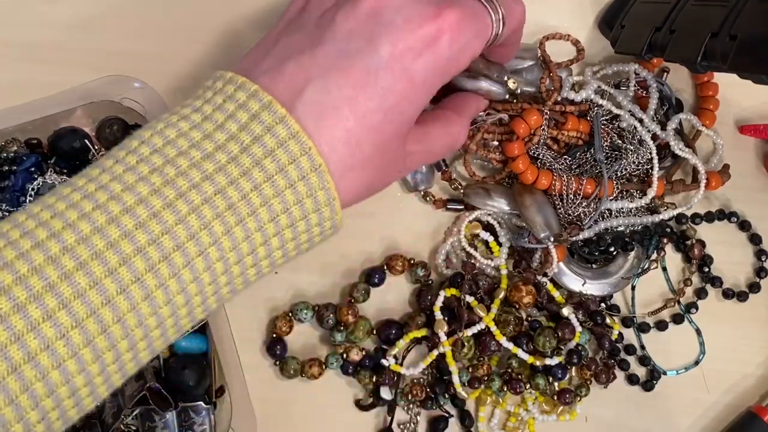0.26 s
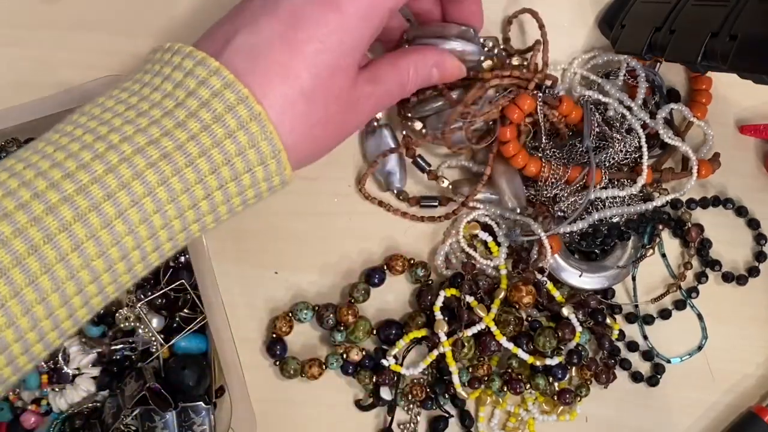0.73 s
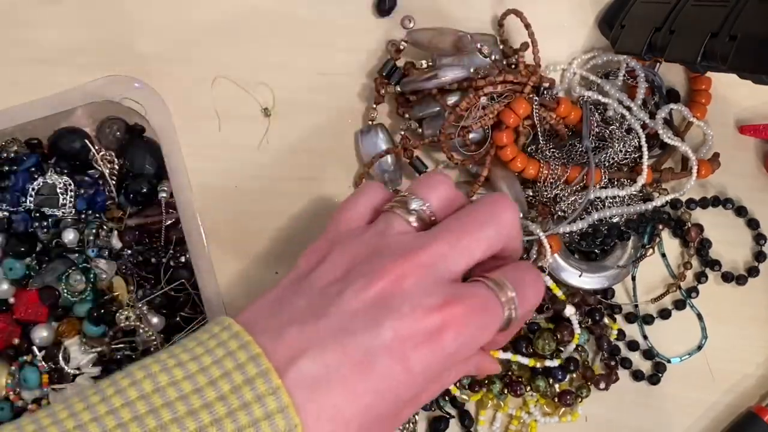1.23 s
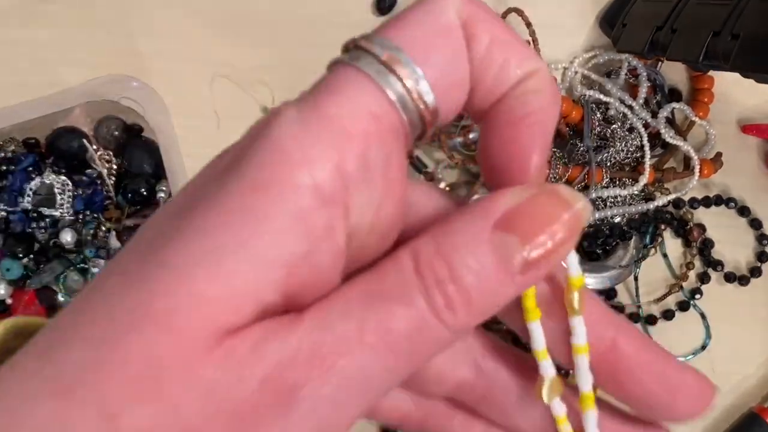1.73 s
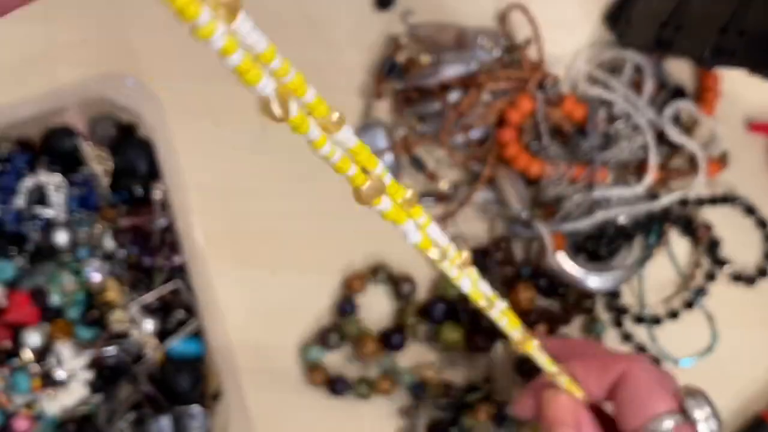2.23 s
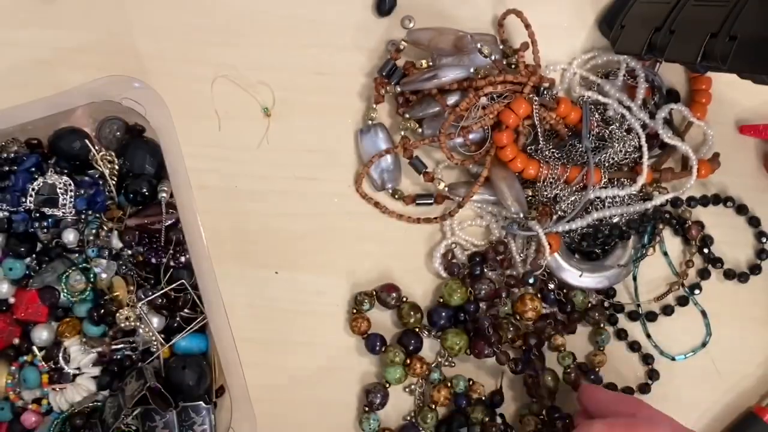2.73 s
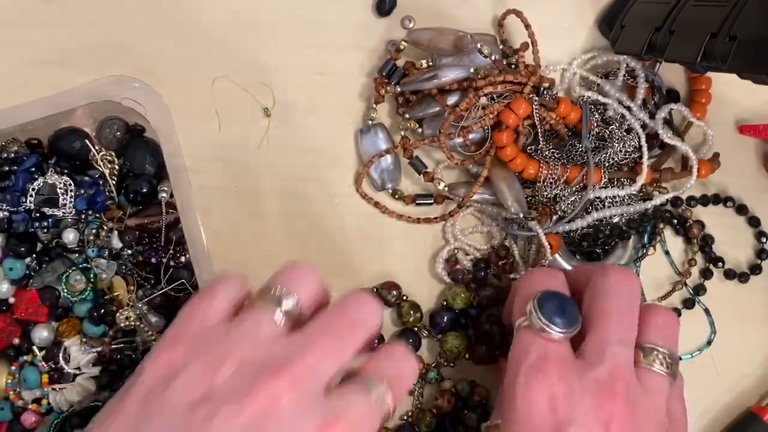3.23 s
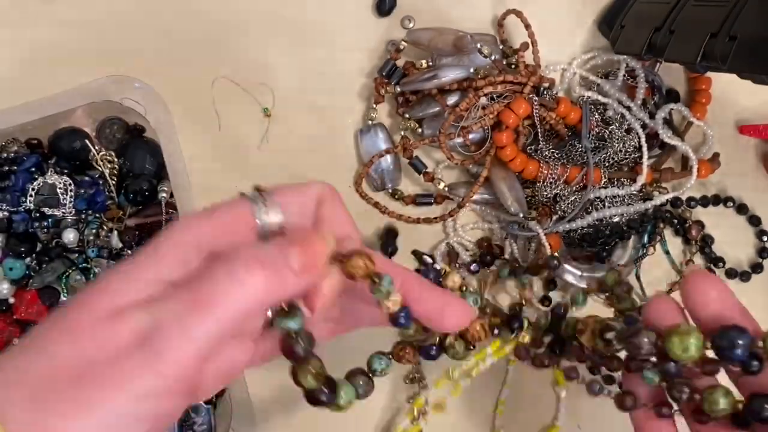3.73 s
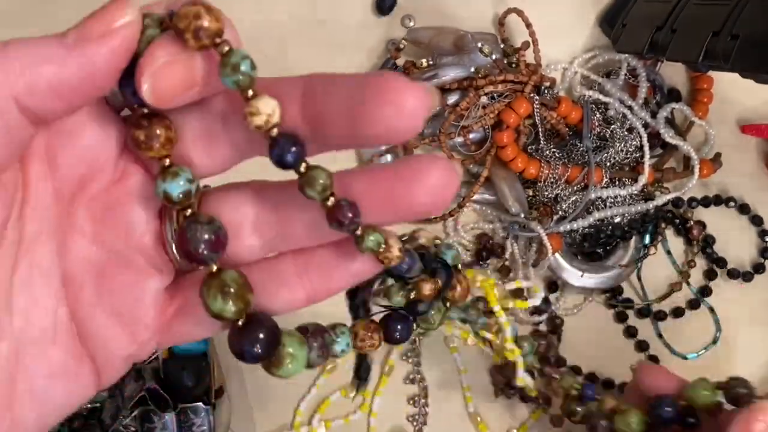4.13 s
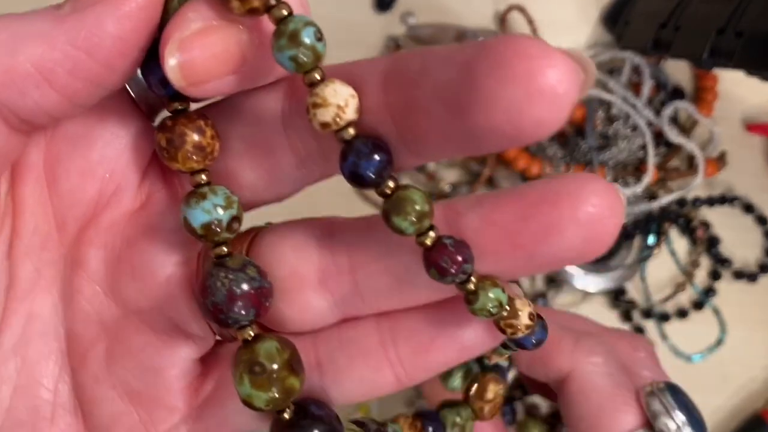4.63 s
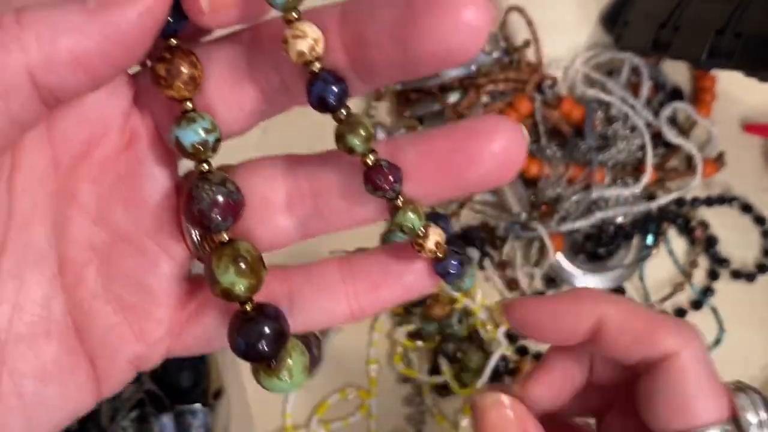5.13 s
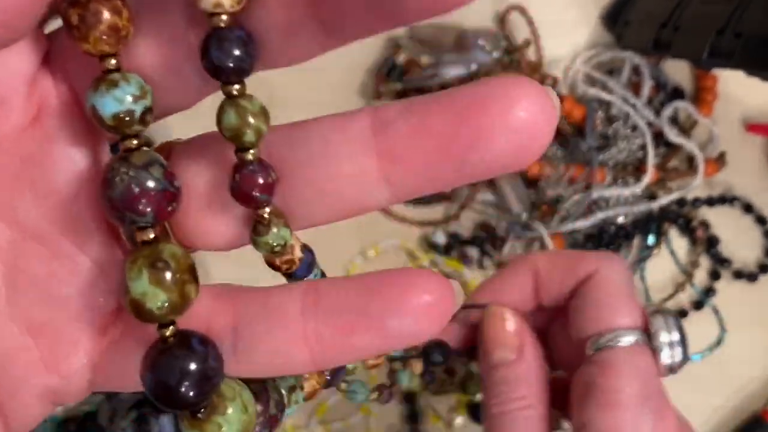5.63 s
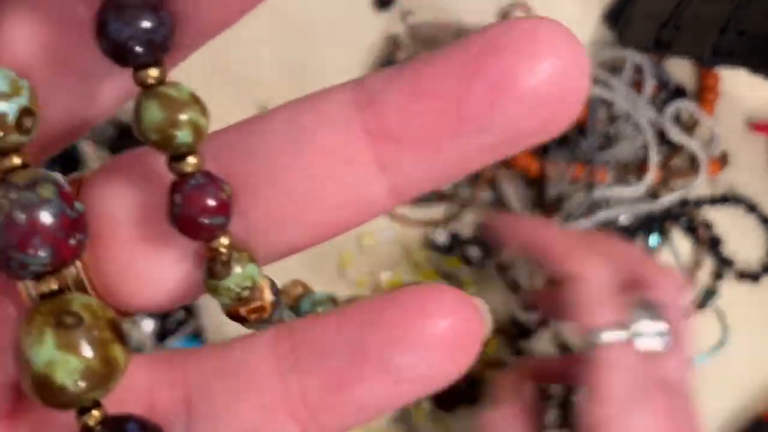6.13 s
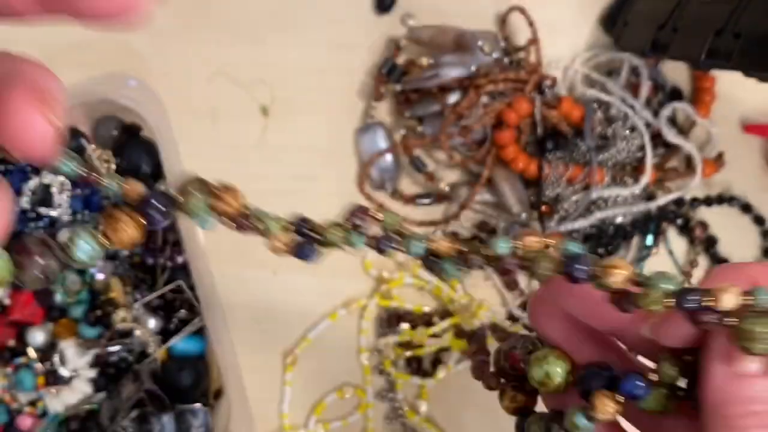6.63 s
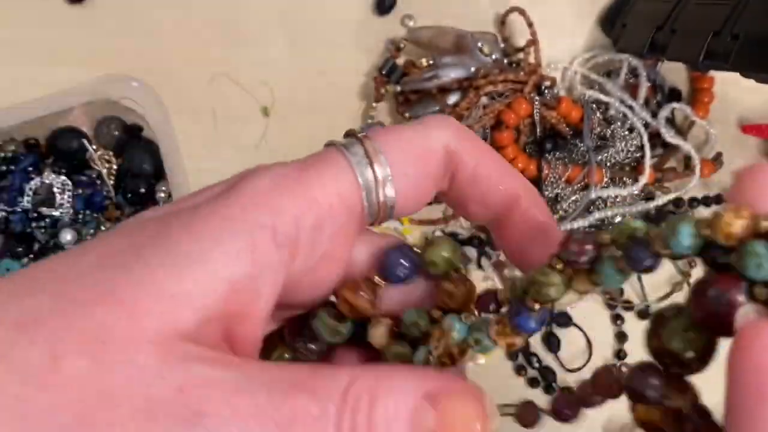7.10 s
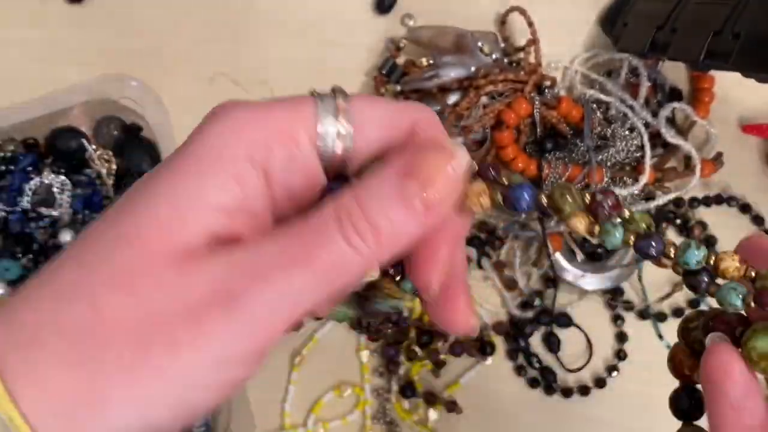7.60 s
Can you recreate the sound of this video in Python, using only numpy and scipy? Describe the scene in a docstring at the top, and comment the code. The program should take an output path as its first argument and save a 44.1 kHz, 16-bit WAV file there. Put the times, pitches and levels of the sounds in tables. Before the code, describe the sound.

Close, dry clatter of stone and glass beads with fine metallic trickles as hands untangle strands on a wooden tabletop, faint squeak near the end.

```python
"""A small room with a wooden table: hands pull bead necklaces and thin chains out of a heap of jewellery.
Big beads clack and knock on the table top: noise bursts coloured by bead tones and the modes of the board.
Small beads and links tick and trickle in between, as clumps of short bright rings over soft rubbing.
Near the end comes a faint thin squeak, a narrow noise band. Low rumble and room hush lie underneath,
and two closely spaced microphones hear the heap from above."""
import sys
import numpy as np
from scipy import signal
from scipy.fft import rfft, irfft, next_fast_len
from scipy.io import wavfile
from scipy.ndimage import uniform_filter1d

SR = 44100
rng = np.random.default_rng(int(sys.argv[2]) if len(sys.argv) > 2 else 0)


def wrap_up_sound(samples):
    """Save the sound to the file named by the first command line argument, as 16-bit audio."""
    columns = np.atleast_2d(samples).T
    # keep every value between -1 and 1, then stretch to whole-number steps
    tamed = np.clip(columns, -1, 1)
    steps = np.round(tamed * 32767).astype(np.int16)
    wavfile.write(sys.argv[1], SR, steps)


N = 346532
TIME = np.arange(N) / SR
SIZE = next_fast_len(N + SR)  # transform length, with space for the reverberation
FREQS = np.maximum(np.arange(SIZE // 2 + 1) * SR / SIZE, 1)
AGE = np.arange(SR // 20) / SR  # time within the ring of one contact

# hand and heavy strands landing on the table: (time [s], relative level [dB])
LANDINGS = [(0.166, -50), (0.365, -48), (0.701, -37), (1.454, -41), (1.542, -40.5), (1.745, -46),
            (3.179, -34), (3.329, -41), (4.226, -38.5), (4.264, -39.5), (4.391, -30), (4.446, -30.5),
            (4.486, -38.5), (4.874, -38), (5.085, -37), (5.849, -41), (6.039, -42), (6.346, -43),
            (7.488, -35.5), (7.505, -48)]


def from_db(db):
    """Decibels to gain."""
    return 10 ** (np.asarray(db) / 20)


def unit(x):
    """Scale to energy 1."""
    return x / np.sqrt(np.sum(x ** 2) + 1e-20)


def at_hz(points, hz):
    """Read a table on a log-frequency axis."""
    f, value = np.transpose(points)
    return np.interp(np.log(hz), np.log(f), value)


def band(x, low_hz, high_hz, order=2):
    """Causal band-pass."""
    edges = [low_hz, min(high_hz, .48 * SR)]
    return signal.sosfilt(signal.butter(order, edges, "band", fs=SR, output="sos"), x)


def lowpass(x, cutoff_hz):
    """Gentle causal low-pass."""
    return signal.sosfilt(signal.butter(2, cutoff_hz, fs=SR, output="sos"), x)


def resonance(x, hz, width_hz):
    """Two-pole resonance with gain 1 on top."""
    r = np.exp(-np.pi * width_hz / SR)
    numerator = np.array([1, 0, -1]) * (1 - r * r) / 2
    denominator = [1, -2 * r * np.cos(2 * np.pi * hz / SR), r * r]
    return signal.lfilter(numerator, denominator, x)


def drift(rate):
    """Random wander through `rate` normal draws a second, joined by straight lines."""
    knots = rng.standard_normal(2000)
    return np.interp(TIME * rate, np.arange(len(knots)), knots)


def add(track, sound, s):
    """Mix a sound into a track at a time."""
    i = int(np.clip(s * SR, 0, N - 1))
    track[i:i + len(sound)] += sound[:N - i]


def hush(apart_hz):
    """Still room: steady low noise shared by both microphones, and a faint hiss that is not."""
    # spectrum of the still room: (frequency [Hz], relative density [dB])
    hush_colour = [(25, -29), (50, -8.5), (75, -17.5), (120, -15.5), (270, -13.5), (600, -29.5),
                   (1100, -33), (4000, -40.5), (14000, -56)]
    level_db = -66.5
    mid, side = rfft(rng.standard_normal((2, SIZE))) * from_db(at_hz(hush_colour, FREQS))
    side = side * FREQS / (FREQS + apart_hz)  # the lows stay common to both sides
    both = irfft(mid + side * [[1], [-1]], SIZE)[:, :N]
    return from_db(level_db) * np.sqrt(2 * N) * unit(both)


def rumble(low_hz, high_hz):
    """A deep band of noise that swells and sinks."""
    # swelling of the rumble: (time [s], level [dB])
    swell = [(0, -70), (.6, -57), (1.1, -66), (1.8, -60), (2.6, -80), (3.5, -60), (4.4, -55), (4.8, -63.5),
             (5.8, -63), (6.5, -56), (7.1, -68), (7.5, -54), (7.86, -65)]
    noise = unit(band(rng.standard_normal(N), low_hz, high_hz)) * np.sqrt(N)
    return noise * from_db(np.interp(TIME, *np.transpose(swell)))


def room(first_echo_s, build_s):
    """Stereo response: the direct sound, then reflections that build up and die band by band."""
    # decay time: (frequency [Hz], t60 [s])
    decay_times = [(100, .27), (300, .26), (700, .18), (1800, .15), (4800, .14), (13000, .08)]
    # strength of the reverberation: (frequency [Hz], relative level [dB])
    reverb_levels = [(100, -9), (350, -6), (700, -3), (1200, -4), (2500, -7), (6000, -9), (14000, -13)]
    # likeness of the reverberation at the two microphones: (frequency [Hz], correlation)
    likeness = [(100, .97), (300, .8), (700, .2), (1200, .1), (2300, .6), (3500, .5), (6000, .1),
                (15000, 0)]
    age = np.arange(SR * 2 // 3) / SR
    onset = 1 - np.exp(-np.maximum(age - first_echo_s, 0) / build_s)
    edges = np.geomspace(50, 18000, 14)
    out = np.zeros((2, len(age)))
    for low, high in zip(edges, edges[1:]):
        hz = np.sqrt(low * high)
        decay = onset * from_db(-60 * age / at_hz(decay_times, hz))
        noises = band(rng.standard_normal((2, len(age))), low, high, order=3)
        mid, side = [unit(noise * decay) for noise in noises]
        alike = np.clip(at_hz(likeness, hz), -1, 1)
        tail = np.sqrt(1 + alike) * mid + np.sqrt(1 - alike) * side * [[1], [-1]]
        out += from_db(at_hz(reverb_levels, hz)) * np.sqrt((high - low) / SR) * tail
    out[:, 0] += 1  # direct sound
    return rfft(out, SIZE)


def squeak(width_hz):
    """A faint, rough squeak: narrow noise shifted up to a pitch that rises a little, then wavers."""
    # glide of the squeak: (time [s], pitch [Hz], relative level [dB])
    glide = [(7.665, 1930, -75), (7.68, 1960, -53.5), (7.72, 1980, -54.5), (7.76, 2070, -54.5),
             (7.785, 2120, -54), (7.802, 2010, -54.5), (7.86, 2050, -55.5)]
    s, pitch_hz, level_db = np.transpose(glide)
    hz = np.interp(TIME, s, pitch_hz)
    db = np.interp(TIME, s, level_db)
    rough = lowpass(rng.standard_normal(N) + 1j * rng.standard_normal(N), width_hz / 2)
    tone = np.real(rough * np.exp(2j * np.pi * np.cumsum(hz) / SR))
    return unit(tone) * np.sqrt(N) * from_db(db) * (TIME > s[0])


def thumps(modes_hz, t60, soft_hz):
    """A soft, heavy touch sets the whole table bending in a few low modes."""
    age = np.arange(SR // 2) / SR
    out = np.zeros(N)
    mode_shares = rng.uniform(0.32, 1, (len(LANDINGS), len(modes_hz)))
    for (s, db), shares in zip(LANDINGS, mode_shares):
        swing = sum(share * np.sin(2 * np.pi * hz * age) for hz, share in zip(modes_hz, shares))
        add(out, from_db(db + 4.0) * swing * from_db(-60 * age / t60), s)
    return lowpass(out, soft_hz)


def table_top(force, ring_db, wander_db):
    """The board gives a dead thud and rings briefly; the share of each mode wanders over time."""
    # modes of the board: (frequency [Hz], relative level [dB], t60 [s])
    board_modes = [(130, 0, .1), (205, -4, .04), (305, -5, .04), (385, -5, .04), (680, -9, .03),
                   (915, -8, .03), (1040, -8, .04), (1513, -6, .05)]
    age = np.arange(SR // 3) / SR
    out = force.copy()
    for k, (hz, db, t60) in enumerate(board_modes):
        mode = (-1) ** k * unit(np.sin(2 * np.pi * hz * age) * from_db(-60 * age / t60))
        push = force * from_db(ring_db + db + wander_db * drift(15))
        out += signal.oaconvolve(push, mode)[:N]
    return out


def clack_body(x, plain):
    """Stone and glass beads lying on wood favour a few broad resonances."""
    # resonances that colour the clacks: (frequency [Hz], width [Hz], gain [dB])
    body_peaks = [(2290, 254, -7), (2620, 150, -4), (3100, 207, -6), (3650, 97, -12)]
    return plain * x + sum(from_db(db) * resonance(x, hz, width) for hz, width, db in body_peaks)


def contacts(count, low_hz, high_hz, t60, snap, own_db=5, own_width=0.044):
    """Rings of single contacts, energy 1: a hard snap and a short burst of noise for a dense cluster of modes."""
    cluster = rng.standard_normal((count, len(AGE))) * from_db(-60 * AGE / t60)
    cluster /= np.linalg.norm(cluster, axis=1, keepdims=True)
    cluster[:, 0] += snap * rng.choice([-1, 1], count)
    rings = band(cluster, low_hz, high_hz)
    own_hz = low_hz * (high_hz / low_hz) ** rng.random(count)  # each bead has a pitch of its own
    for ring, hz in zip(rings, own_hz):
        ring += from_db(own_db) * resonance(ring, hz, hz * own_width)
    return rings / np.linalg.norm(rings, axis=1, keepdims=True)


def bead_tones(rings, low_hz, high_hz, cycles, tone_db, count):
    """Each struck bead rings on in a few modes of its own, dying 60 dB in `cycles` periods; energy 1."""
    hz = low_hz * (high_hz / low_hz) ** rng.random((len(rings), count, 1))
    decay = from_db(-60 * AGE * hz / cycles)
    modes = np.sin(2 * np.pi * hz * AGE) * decay * rng.choice([-1, 1], hz.shape)
    tones = modes.sum(axis=1)
    return np.array([unit(ring + from_db(tone_db) * unit(tone)) for ring, tone in zip(rings, tones)])


def glint(bright_db, body_db, slope):
    """Level of the very top: the less body a contact has, the smaller the bead and the higher it rings."""
    return bright_db + slope * np.clip(bright_db - body_db, -6, 14)


def strike(rings, times, levels_db, rebound_db, rebound_s):
    """Each strike jolts its neighbours on the string, which click a few milliseconds later."""
    out = np.zeros(N)
    span_s = .01  # levels hold for a strike's energy spread over this time
    chance = rng.random((len(rings), 3))
    for k, (s, db) in enumerate(zip(times, levels_db)):
        size = from_db(db) * np.sqrt(SR * span_s)
        add(out, size * rings[k], s)
        for n, late in enumerate(np.cumsum(chance[k]) * rebound_s):
            add(out, size * from_db(rebound_db - 4.9 * n) * rings[k - n - 1], s + late)
    return out


def tings():
    """Very high, tiny metallic ticks, alone or on top of a strike: short noise rings in the top octave."""
    # very high ticks: (time [s], relative level [dB])
    high_ticks = [(1.666, -25.5), (1.983, -37), (2.228, -26), (2.26, -25), (2.853, -32), (3.002, -47.5),
                  (3.202, -21.5), (3.452, -25.5), (4.225, -22), (4.603, -29), (4.763, -37), (4.904, -32),
                  (4.951, -38), (4.958, -37), (4.978, -40), (4.995, -28), (5.052, -35), (5.063, -30),
                  (5.072, -28), (5.111, -28), (5.253, -36), (6.7225, -29), (6.876, -31), (6.933, -26),
                  (7.005, -25), (7.042, -23), (7.084, -39.5)]
    s, db = np.transpose(high_ticks)
    rings = contacts(len(s), low_hz=10100, high_hz=15400, t60=0.012, snap=0.26)
    return strike(rings, s, db - 3.0, rebound_db=-7, rebound_s=.005)


def jostle(level_db, per_s, spread_db, clump_db):
    """Moments and sizes [dB] of small contacts, coming in clumps; a louder rustle has more of them."""
    busy = from_db((level_db - np.median(level_db)) / 4 + clump_db * drift(30))
    at = np.flatnonzero(rng.random(N) < per_s * np.clip(busy, .4, 2) / SR)
    return at, spread_db * np.minimum(rng.exponential(1, len(at)), 3.5)


def trickle(touches, rings, level_db, unlike_db, rub=.38):
    """Every small contact sounds one of the rings, over a steady friction noise; both follow the level."""
    at, size_db = touches
    sizes = from_db(size_db + unlike_db * rng.standard_normal(len(at)))
    picks = rng.integers(0, len(rings), len(at))
    out = np.zeros(N)
    for i, size, pick in zip(at, sizes, picks):
        add(out, size * rings[pick], i / SR)
    out /= np.sqrt(uniform_filter1d(out ** 2, size=SR // 6) + 1e-9)  # even out before the level is applied
    colour = np.sqrt(np.mean(np.abs(rfft(rings)) ** 2, axis=0))  # rubbing has the mean colour of the rings
    friction = signal.oaconvolve(rng.standard_normal(N), np.fft.fftshift(irfft(colour)), mode="same")
    return (out + rub * friction) * from_db(level_db)


def rustle_levels(hits):
    """Levels [dB] of dragging, big and small beads: the rustling swells and fades, strikes leave it settling."""
    # stretches of rustling: (start [s], length [s], big beads midway [relative dB], swell over the stretch [dB],
    # small beads and links [dB re big beads], dragging on the table [dB re big beads])
    stretches = [(0.163, .11, -54.5, -3.5, -21, 8), (0.372, .23, -47, 7, 2.5, -0.5),
                 (0.655, .1, -39, 2.5, -15, -0.5), (0.8, .025, -51, -5, -17, 16.5),
                 (1.12, .11, -53, -2, 9, 10), (1.281, .14, -51, 19, 11.5, 5.5),
                 (1.415, .155, -36, 6, 7, -2), (1.58, 0.12, -45, -2, 10, -2), (1.68, .26, -40, -1, 9.5, 0),
                 (1.95, .23, -42, 2, 3.5, 2.5), (2.2, .18, -35, -2.5, 0.5, 4), (2.42, 0.14, -54, 9, 3.5, 1),
                 (2.534, .075, -42, 5, -2.5, 0), (2.63, .27, -42, 4, 3, -2.5),
                 (2.899, 0.11, -52, 2.5, 4, -13), (3.16, 0.084, -36, -8, 1.5, 2.5),
                 (3.279, .16, -33.5, 5.5, 1.5, -2.5), (3.447, 0.087, -41, 13, 8.5, -4),
                 (3.544, 0.11, -31.5, -2, 7.5, -1.5), (3.66, .27, -37, -7.5, 8, -5),
                 (3.971, .16, -37, 1, 8.5, -8.5), (4.179, 0.098, -31.5, 8, 6, -3.5),
                 (4.312, .15, -29, 8, 4, -0.5), (4.57, 0.21, -59.5, 1, 8.5, 5.5),
                 (4.801, .18, -44.5, -7, 9, -0.5), (5.087, .2, -43, -5, 4.5, 3),
                 (5.28, .555, -45, 1, 3, -1), (5.845, 0.0656, -36, 0, -10, 2),
                 (5.927, 0.4, -43, -9, 5.5, 0), (6.331, .06, -34, -4.5, -3, -2),
                 (6.4, .07, -42, -2, 9, -1.5), (6.478, 0.075, -36, -10, -1, -7.5),
                 (6.561, .21, -42, 0, 5.5, -4), (6.789, .15, -46.5, 2.5, 8.5, -2),
                 (6.947, 0.042, -42.5, 0, 16.5, -2), (7.017, 0.283, -58, 8, 16.5, -5),
                 (7.308, .2, -34, 7.5, 4.5, -3), (7.601, .26, -55, -3, 10, -0.5)]
    attack_s, release_db_per_s = .015, 250
    settle_db, settle_db_per_s = -14.5, 215  # settling relative to its strike, and its fall
    settle_drag_db, settle_links_db = -4.5, 2  # dragging and small beads in that settling
    settle_per_db, firm_db = 0.3, -22  # extra dB less settling for each dB below a firm strike
    shift_db_per_s = 760.5  # the beads start to shift just before they strike
    t = TIME[::40]
    power = np.full((3, len(t)), 1e-10)
    for start, length, db, swell_db, links_db, drag_db in stretches:
        age = t - start
        swell = swell_db * (np.clip(age / length, 0, 1) - .5)
        held_db = db + swell - release_db_per_s * np.maximum(age - length, 0)
        layers_db = np.array([[drag_db], [0], [links_db]])
        power += (np.clip(age / attack_s, 0, 1) * from_db(held_db + layers_db)) ** 2
    for s, clack_db, tick_db in zip(*hits):
        layers_db = np.array([[clack_db + settle_drag_db], [clack_db], [tick_db + settle_links_db]])
        first_db = settle_db + settle_per_db * min(clack_db - firm_db, 0) + layers_db
        fall_db = np.where(t > s, settle_db_per_s, shift_db_per_s) * np.abs(t - s)
        power += from_db(first_db - np.minimum(fall_db, 120)) ** 2
    return [np.interp(TIME, t, 10 * np.log10(p)) for p in power]


def rustling(hits):
    """The trickle between the strikes: dragging on the table, big beads, small beads and links."""
    drag_db, beads_db, links_db = rustle_levels(hits)
    touches = jostle(beads_db, per_s=420, spread_db=3.6, clump_db=1.6)
    drag_rings = contacts(40, low_hz=80.6, high_hz=1362, t60=0.026, snap=0.32, own_db=2, own_width=0.21)
    bead_rings = contacts(60, low_hz=1290, high_hz=4600, t60=.021, snap=.15, own_db=9, own_width=.06)
    link_rings = contacts(50, low_hz=4300, high_hz=10300, t60=.012, snap=.35)
    glint_rings = contacts(40, low_hz=8600, high_hz=15500, t60=.01, snap=.4)
    glint_db = glint(links_db, beads_db, slope=0.66)
    drag = trickle(touches, drag_rings, drag_db - 8.0, unlike_db=2.5)
    beads = trickle(touches, bead_rings, beads_db - 3.5, unlike_db=0.0)
    links = trickle(touches, link_rings, links_db - 8.5, unlike_db=7.0)
    glints = trickle(touches, glint_rings, glint_db - 13.0, unlike_db=6.5)
    return drag, beads, links + glints


def all_strikes():
    """Single strikes as times, clack dB, tick dB; the stronger of the two has the listed level."""
    # single bead strikes: (time [s], relative level [dB], brightness: tick over clack [dB]),
    # brightness is high for small beads and links
    bead_strikes = [(0.1666, -31.5, -9), (0.2237, -39, -1.5), (0.273, -27.5, 10), (0.3644, -27.5, -8.5),
                    (0.499, -32.5, 5.5), (0.538, -33, 5), (0.573, -22, 8.5), (0.6543, -20, -1),
                    (0.6833, -25, -3.5), (0.6965, -16.5, -5.5), (0.7091, -23.5, -3), (0.7407, -26.5, -7),
                    (0.803, -28.5, 1), (0.8147, -37.5, -9.5), (1.2165, -41.5, 1.5), (1.375, -38, -3),
                    (1.4252, -32.5, -16), (1.442, -29, -18), (1.46, -32, 7), (1.481, -31, -10),
                    (1.512, -26, -12.5), (1.535, -22.5, -19), (1.546, -24, -3), (1.571, -30.5, -12.5),
                    (1.667, -38, -5), (1.708, -28, 1), (1.7555, -31, 6), (1.855, -36.5, 13),
                    (1.917, -24.5, 2), (1.925, -28.5, 2), (2.1157, -28.5, -16), (2.1727, -34.5, 19),
                    (2.2011, -20.5, -0.5), (2.208, -23.5, -6), (2.2265, -32, -4), (2.244, -31, 11),
                    (2.2722, -19, -15), (2.358, -30.5, -6), (2.3844, -32, -12), (2.6293, -30.5, -2),
                    (2.7027, -31, -6.5), (2.7566, -23.5, -0.5), (2.7832, -22, 1.5), (2.7934, -19.5, 8),
                    (2.8439, -18.5, 5.5), (3.079, -19.5, 6), (3.091, -39, 2), (3.106, -28, 4.5),
                    (3.159, -24.5, 7), (3.1768, -18.5, -1), (3.2037, -26, -4), (3.288, -38, -22),
                    (3.313, -26, -21), (3.33, -26.5, -8), (3.36, -31, -2), (3.3863, -14.5, -6),
                    (3.452, -40, 12), (3.5101, -24.5, -1.5), (3.711, -24.5, 4), (3.7662, -21.5, 13),
                    (3.7813, -26, 9), (3.844, -24.5, 9.5), (3.8994, -30, 8), (3.92, -31, 12),
                    (3.9732, -23, 8.5), (3.9841, -25, 11), (3.9958, -29, 2.5), (4.0128, -35, -3),
                    (4.0277, -28.5, 3.5), (4.094, -25, 3), (4.1038, -31, 0), (4.1867, -21, 1.5),
                    (4.2243, -20, 8.5), (4.268, -25, -3), (4.331, -22, 9), (4.341, -23, 1),
                    (4.364, -19.5, 3), (4.389, -6.5, -7), (4.4005, -13, -19), (4.41, -26, -16),
                    (4.425, -25, 4), (4.447, -21.5, 5), (4.484, -13.5, -23), (4.585, -38.5, 20),
                    (4.8166, -36, 2), (4.829, -26.5, 8), (4.8727, -20, -9), (4.994, -28, 13),
                    (5.0821, -17, 3.5), (5.096, -17.5, 4.5), (5.148, -29, -4), (5.2128, -41, 22),
                    (5.2305, -23.5, 1.5), (5.323, -32.5, 2.5), (5.3597, -24, 5), (5.394, -40, -2),
                    (5.4115, -30.5, 4), (5.419, -40.5, 3), (5.4491, -26, 0.5), (5.497, -27.5, 1),
                    (5.5412, -26, 2), (5.5805, -31.5, -1), (5.6008, -35, -5), (5.643, -28.5, 2),
                    (5.6703, -31.5, 8.5), (5.693, -32.5, 1), (5.708, -35, 3), (5.722, -37, 1),
                    (5.729, -36, 25), (5.738, -32, 2), (5.8477, -30.5, -26), (5.8691, -23.5, 3.5),
                    (5.8908, -31, -11), (6.038, -24, 8), (6.067, -18.5, 7), (6.0826, -16, 9),
                    (6.174, -33, 1), (6.3142, -35, 12), (6.348, -26.5, 9), (6.4538, -30, 12),
                    (6.48, -37, 2), (6.5255, -39.5, -4), (6.5459, -31.5, 2.5), (6.586, -28.5, 2.5),
                    (6.606, -18.5, 7.5), (6.688, -20, 6), (6.722, -35, 3), (6.7345, -25.5, 8),
                    (6.877, -38.5, 20), (6.933, -40, 6), (6.966, -34.5, 11), (7.005, -35, 15),
                    (7.0949, -34, 24), (7.1529, -31, 30), (7.2212, -30.5, 12), (7.3257, -18, 7.5),
                    (7.363, -15, 8.5), (7.3761, -21, 4), (7.389, -9, 4), (7.428, -16, 11.5),
                    (7.475, -14.5, 7.5), (7.484, -15.5, 3), (7.4934, -9.5, 8.5), (7.589, -25.5, 8),
                    (7.6355, -42.5, 11.5), (7.6744, -39.5, 18.5), (7.7793, -27.5, 19),
                    (7.8218, -39.5, 19.5)]
    s, db, bright_db = np.transpose(bead_strikes)
    return s, db - np.maximum(bright_db, 0), db + np.minimum(bright_db, 0)


def strikes(s, clack_db, tick_db):
    """The single strikes: force on the table, clack of big beads, bright tick. Heavy landings knock too."""
    landing_s, landing_db = np.transpose(LANDINGS)
    knock_s = np.r_[s, landing_s]
    bead_knock_db = clack_db - 19 + 0.044 * (tick_db - clack_db)  # slightly more for brighter strikes
    knock_db = np.r_[bead_knock_db, landing_db + 3.5]
    glint_db = glint(tick_db, clack_db, slope=0.89)
    knock_rings = contacts(len(knock_s), low_hz=140, high_hz=1600, t60=.028, snap=.5, own_db=-2, own_width=.2)
    clack_rings = contacts(len(s), low_hz=1250, high_hz=4600, t60=.018, snap=.3)
    clack_rings = bead_tones(clack_rings, low_hz=1400, high_hz=4200, cycles=130, tone_db=-6.5, count=5)
    tick_rings = contacts(len(s), low_hz=4260, high_hz=9430, t60=0.026, snap=0.3)
    glint_rings = contacts(len(s), low_hz=10050, high_hz=13500, t60=0.0052, snap=0.79)
    knocks = strike(knock_rings, knock_s, knock_db, rebound_db=-14.5, rebound_s=0.0085)
    clacks = strike(clack_rings, s, clack_db - 3.5, rebound_db=-8.0, rebound_s=0.009)
    ticks = strike(tick_rings, s, tick_db - 3.5, rebound_db=-34.0, rebound_s=0.036)
    glints = strike(glint_rings, s, glint_db - 8.5, rebound_db=-19.0, rebound_s=0.0031)
    return knocks, clacks, ticks + glints


def jewellery():
    """Clacks and big-bead trickle share one body; strikes and landings make the table ring."""
    hits = all_strikes()
    knocks, clacks, ticks = strikes(*hits)
    drag, beads, links = rustling(hits)
    board = table_top(knocks, ring_db=-15, wander_db=3)
    thuds = thumps(modes_hz=[85, 103, 130], t60=.13, soft_hz=221)
    return board + drag + thuds + clack_body(clacks + beads, plain=0.84) + ticks + links + tings()


def scattered(x, lag_samples):
    """Contacts lie all over the heap: a wandering small time shift, opposite on the two sides."""
    return x + lag_samples * drift(100) * np.gradient(x) * [[1], [-1]]


def scene():
    """The heap in its room, reaching the two microphones at slightly different times."""
    # colour of the whole heap: (frequency [Hz], gain [dB])
    heap_colour = [(40, -32.5), (100, -1.5), (135, 0.5), (170, -8.5), (205, 1), (260, -0.5), (380, 2.5),
                   (520, 1.5), (750, 4), (1050, 4.5), (1300, -1), (2500, 1), (4000, 1), (5100, -3),
                   (6800, 3), (10500, -9.5), (14000, 4), (16000, -2.5)]
    # the left microphone is nearer: (frequency [Hz], phase lead of left over right [rad])
    left_lead = [(50, 0), (350, 0), (800, -.6), (1100, -.2), (1550, 0), (2580, .6), (4000, .3), (5000, 1.9),
                 (6000, 1.6), (7750, 2.7), (11600, 3.3), (14200, 4.6), (16000, 5.6)]
    # balance of the microphones: (frequency [Hz], left minus right [dB])
    left_balance = [(130, 0), (400, 3.5), (750, 2), (1050, 5), (1700, 0), (16000, 0)]
    heap = scattered(jewellery(), lag_samples=0.15) + squeak(width_hz=150)
    source = rfft(heap, SIZE) * from_db(at_hz(heap_colour, FREQS))
    sides = np.array([[.5], [-.5]])  # half of each difference goes to each side
    microphones = from_db(sides * at_hz(left_balance, FREQS)) * np.exp(1j * sides * at_hz(left_lead, FREQS))
    heard = irfft(source * microphones * room(first_echo_s=0.00057, build_s=.0002), SIZE)[:, :N]
    return heard + hush(apart_hz=800) + rumble(low_hz=40.7, high_hz=61.0)


def record(dry):
    """Peaks are softly rounded off and the top is cut steeply at 16 kHz."""
    rounded = 1.2 * np.tanh(dry / 1.2)
    return signal.sosfilt(signal.ellip(10, .1, 70, 16000, fs=SR, output="sos"), rounded)


dry = scene()
out = record(dry)
wrap_up_sound(out)
```